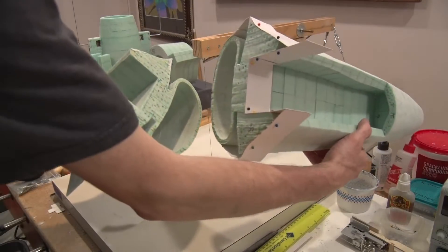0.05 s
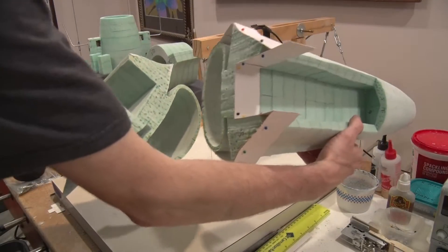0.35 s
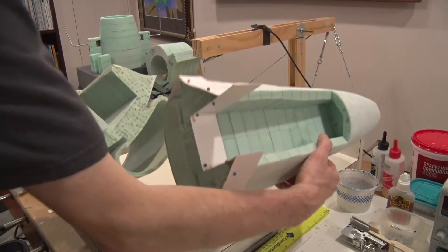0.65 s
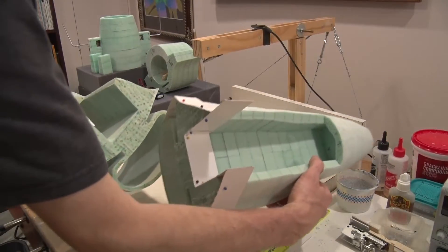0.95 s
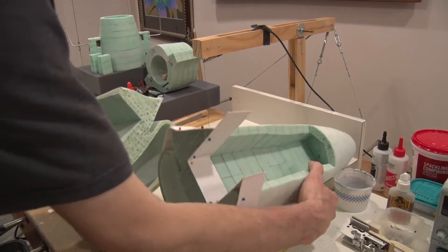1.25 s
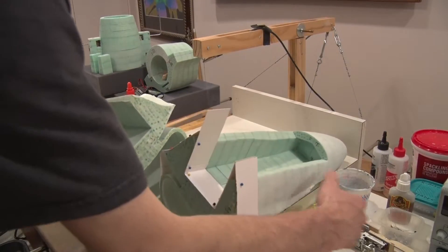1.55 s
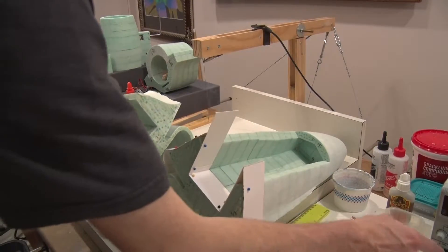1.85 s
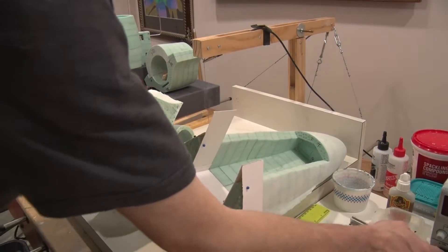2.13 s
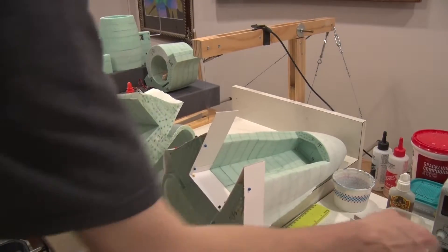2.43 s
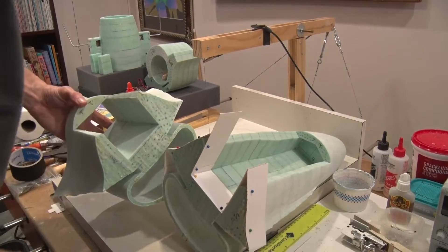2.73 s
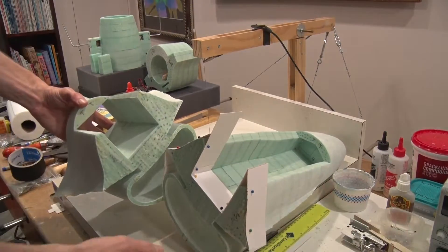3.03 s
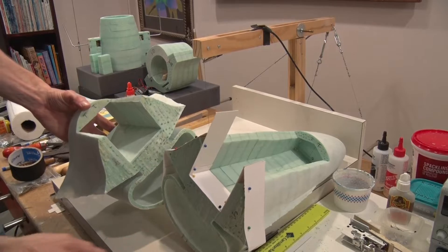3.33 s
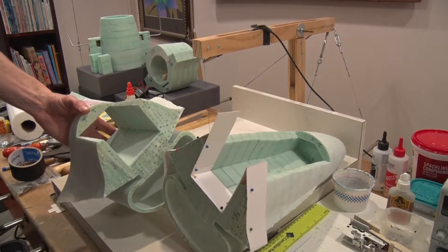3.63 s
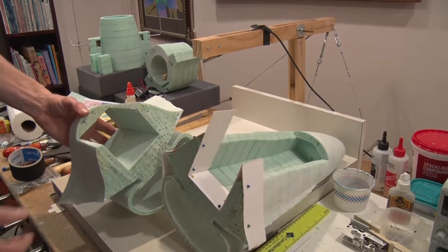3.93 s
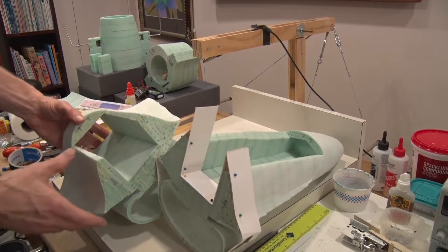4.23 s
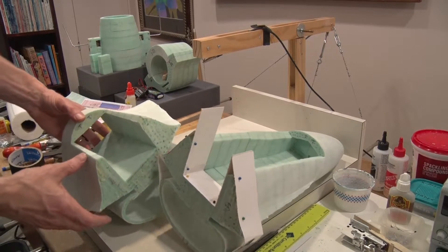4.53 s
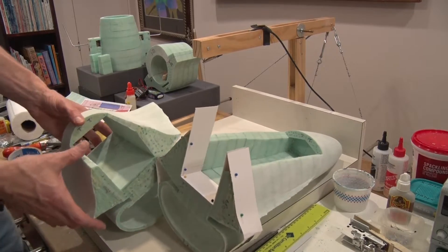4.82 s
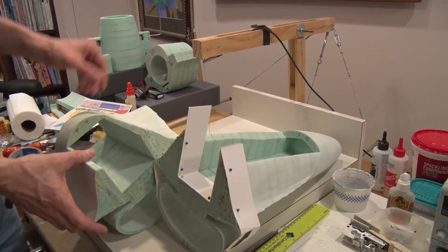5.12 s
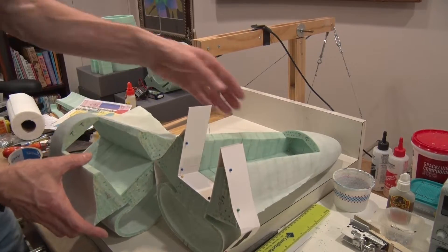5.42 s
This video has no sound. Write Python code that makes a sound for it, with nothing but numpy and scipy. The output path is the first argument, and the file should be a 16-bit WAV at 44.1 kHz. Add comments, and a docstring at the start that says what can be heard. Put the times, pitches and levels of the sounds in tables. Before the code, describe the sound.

Close by in a small, quiet workshop, light foam pieces are handled on a bench. Dull, hollow bumps come first, followed by a dry scrape and a clicking knock as one piece is set down. A hard object clacks once. Short squeaks follow, then foam rubs on foam, catching and snapping free before the rubbing fades. Faint sleeve rustle runs underneath.

```python
"""Foam pieces on a workbench

A hollow foam shell bumps, rocks, scrapes and lands, ringing with the bench; something hard clacks down.
A second foam piece is gripped, dragged over and pressed against the first. The foam catches and slips,
so it squeaks, hisses and snaps free. A shirt rustles close by in the small, quiet workshop."""
import sys
import numpy as np
from scipy import signal
from scipy.fft import rfft, irfft, next_fast_len
from scipy.io import wavfile

SR = 44100
rng = np.random.default_rng(int(sys.argv[2]) if len(sys.argv) > 2 else 0)


def wav_record(signal):
    """Record a signal, one row per channel, as 16-bit PCM in the file named by sys.argv[1]."""
    frames = np.transpose(np.atleast_2d(signal))
    bounded = np.clip(frames, -1, 1)
    # unit amplitude maps onto the largest positive 16-bit level
    quanta = np.round(bounded * 32767).astype(np.int16)
    wavfile.write(sys.argv[1], SR, quanta)


N = 245637
T = np.arange(N) / SR
BLOW_T = T[:SR // 2]  # half a second for one blow to die away

# The steady air of the room. Each row: pitch in Hz, level in dB.
AIR_COLOUR = [(20, -19.5), (58, 7), (99, -7.5), (185, -1), (427, -25), (714, -8), (1020, -7.5),
              (2110, -11.5), (2610, -22.5), (3620, -15), (6210, -26.5), (14000, -37), (16000, -71.5)]
# The sleeve rustles as the arm moves. Each row: time in seconds, level in dB.
SLEEVE_LEVELS = [(0, -50), (.87, -50), (1.9, -49.5), (2.45, -49), (2.98, -58), (3.5, -63.5), (4.03, -60.5),
                 (4.4, -53.5), (5.2, -69), (5.57, -62.5)]
# The dragged piece shudders on the bench. Each row: time in seconds, level in dB.
DRAG_LEVELS = [(4.1, -91), (4.19, -71), (4.24, -58), (4.33, -53), (4.42, -53), (4.5, -66), (4.56, -72),
               (4.8, -64), (4.95, -100)]
# How dull or bright each sound is. Each row: pitch in Hz, level in dB.
SLEEVE_COLOUR = [(65, -36.5), (110, -44), (140, -4.5), (198, -6.5), (297, -0.5), (327, -2.5), (485, -1.5),
                 (594, 1), (770, -6), (873, -12), (1100, -30.5), (1430, -31.5), (2420, -63.5)]
ECHO_COLOUR = [(100, 22), (700, 2.5), (3000, 0.5), (6000, -2.5), (10000, -5), (16000, -14.5)]
SIDE_ECHO_COLOUR = [(130, -49.5), (250, -58), (500, -24), (1000, -13), (4000, -11), (12000, -13)]
HISS_COLOUR = [(900, -18.5), (1800, -2.5), (2600, 1.5), (4300, 4), (7500, -4), (10500, -11.5),
               (15500, -21.5)]
BODY_COLOUR = [(580, -11), (700, 3), (870, -4), (1020, -3), (1350, -3.5), (1700, -5.5), (2200, -6),
               (3200, -18)]
DRAG_COLOUR = [(30, -2.5), (60, -2.5), (130, 5.5), (240, 0), (450, -5.5), (800, -20)]
SCRAPE_COLOUR = [(150, -27), (230, -9.5), (400, -16.5), (612, -11.5), (709, -5), (1100, -13), (1700, -10.5),
                 (4600, -16), (8580, -28), (16000, -44.5)]
# How long the room echoes. Each row: pitch in Hz, seconds to fade by 60 dB.
ECHO_FADES = [(200, 0.25), (2000, 0.45), (6000, 0.4), (14000, 0.36)]
# A hand or a flat face slides over foam.
# Each row: start in seconds, length in seconds, hiss in dB, hollow body in dB.
SLIDES = [(-.03, 0.11, -52, -53), (1.379, 0.099, -49.5, -46.5), (1.423, 0.18, -40, -37.5),
          (1.633, 0.14, -43, -44), (1.884, 0.081, -55.5, -50), (2.086, 0.094, -55, -56),
          (3.751, 0.96, -58.5, -53), (4.264, 0.41, -44, -43.5), (4.488, 0.047, -34, -45),
          (4.745, 0.19, -47.5, -43.5), (4.976, 0.21, -43, -48.5), (5.187, 0.16, -53.5, -54.5),
          (5.348, 0.28, -50.5, -51.5)]
# A foam edge scrapes.
# Each row: start in seconds, length in seconds, level in dB, brightness in dB per octave.
SCRAPES = [(0.138, 0.0061, -50, 6.5), (0.412, 0.041, -55.5, 2), (0.677, 0.03, -56.5, 3.5),
           (0.772, 0.058, -48, -0.5), (1.286, 0.11, -50.5, 3), (1.43, 0.013, -37.5, -2.5),
           (1.448, 0.039, -42, 9.5), (1.575, 0.032, -39, 2.5), (2.049, 0.028, -49.5, -1),
           (4.175, 0.04, -40, 1.5), (4.313, 0.045, -39.5, 8), (4.369, 0.03, -41, 1),
           (4.407, 0.012, -37.5, 3.5), (4.572, 0.019, -37.5, 3), (4.694, 0.013, -42.5, 5.5),
           (4.738, 0.0046, -31, -0.5), (4.826, 0.014, -39, -0.5), (4.995, 0.051, -46.5, 3),
           (5.054, 0.028, -43, 0.5), (5.501, 0.077, -52, 15)]
# Foam or a fingertip sticks and slips.
# Each row: start in seconds, length in seconds, first and last pitch in Hz, level in dB.
JUDDERS = [(1.427, 0.09, 1130, 1070, -40), (1.459, 0.031, 369, 650, -38.5), (1.484, 0.07, 1028, 1150, -40),
           (4.173, 0.0265, 308, 186, -46), (4.976, 0.043, 243, 117, -49)]
# The gripped piece squeaks.
# Each row: start in seconds, length in seconds, level in dB, extra level of its tone in dB.
SQUEAKS = [(2.797, 0.0086, -47.5, 7), (3.025, 0.0097, -53.5, 7), (3.193, 0.047, -43, 8.5),
           (3.248, 0.062, -43.5, 8), (3.413, 0.027, -53, -9.5), (3.524, 0.0055, -48.5, 0.5),
           (3.565, 0.01, -50, -2), (3.636, 0.016, -43, 4), (3.674, 0.0066, -44, -8),
           (3.995, 0.011, -55, 14)]
# Where the rubbed foam wall rings. Each row: pitch in Hz, width in Hz, level in dB.
WALL_TONES = [(555, 22, 10), (1130, 64, 4.5), (1404, 120, -1), (2060, 150, -5), (2660, 115, -13),
              (3110, 180, -7), (3650, 60, -0.5), (4130, 68, -4), (4600, 150, -8), (5240, 190, -12),
              (5800, 180, -10)]
# The ringing of the hard thing, the hand-held shell, and the shell resting on the bench.
# Each row: pitch in Hz, level in dB, seconds to fade by 60 dB.
HARD_TONES = [(371, -9, 0.14), (577, -5.5, 0.5), (1238, 0, 0.11), (2290, -10.5, 0.22), (2600, -8.5, .1),
              (3282, 10.5, 0.03), (5000, 3, 0.1), (7220, 6, 0.021), (13900, 10, 0.0038)]
SHELL_TONES = [(150, -6, 0.46), (197, -15, 0.22), (226.7, -5.5, 0.28), (287, -15.5, 0.73), (326, -8.5, .15),
               (372, -3.5, 0.41), (465.2, 3, 0.43), (503, -10.5, 0.17), (616, -32, 0.14), (670, 1, 0.084),
               (800, -17, 0.12)]
LANDING_TONES = [(221, -5, 0.2), (312, -8.5, 0.15), (367, 5, 0.13), (518, 6, 0.34), (696, 4, 0.23),
                 (757, -17, 0.15), (864, -2.5, 0.11), (970, -1, 0.18), (1035, -0.5, .16), (1180, 0.5, 0.12),
                 (1220, -8, 0.1)]
# Sharp foam clicks: the shell striking the bench, and edges snapping free. Each row: start in seconds,
# level in dB, low and high cutoff in Hz, ringing pitch in Hz, ringing level in dB.
FOAM_CLICKS = [(0.2893, -23, 1200, 4350, 2000, 3), (0.5287, -24, 1200, 4400, 1310, 4),
               (0.6992, -46, 700, 2200, 1110, 0), (0.928, -39.5, 2000, 4200, 4300, 3),
               (1.2151, -28.5, 1200, 7500, 4700, 3.5), (1.4519, -6, 323, 4100, 770, -3),
               (1.565, -22.5, 2500, 7200, 4500, 2), (1.617, -6, 300, 5500, 980, -3),
               (1.6193, -5.5, 892, 10700, 3840, -41.5), (1.658, -16, 700, 3430, 1170, -3),
               (2.1962, -37, 3970, 13900, 7950, -4.5), (2.242, -32, 900, 3500, 2600, 1),
               (2.96, -30.5, 4000, 4800, 5870, -6), (3.845, -29, 890, 5660, 4270, -36),
               (3.967, -20.5, 870, 5700, 3650, -13), (4.5111, -7.5, 2030, 7000, 3710, 0.5),
               (4.5125, -11, 3000, 5970, 4770, 21), (4.7464, -0.5, 9000, 9700, 5000, -6.5),
               (4.7478, -5, 1220, 4600, 2150, -8), (4.7495, -9, 700, 4030, 970, -6),
               (5.041, -23.5, 910, 1620, 1240, 3), (5.4056, -32, 1500, 8100, 3350, 1)]
# The shell bumps the bench. Each row: start in seconds, level in dB, treble cutoff in Hz.
KNOCKS = [(0.2895, -5, 780), (0.5275, -7, 725), (0.551, -12.5, 637), (0.6984, -8, 563), (0.832, -12, 400),
          (0.9272, -11, 382), (0.97, -16, 260), (1.097, -16.5, 320), (1.222, -18.5, 238), (1.258, -18, 400),
          (1.295, -24.5, 1400), (1.617, -19, 2530), (1.657, -13.5, 1520)]


def amp(db):
    """Turn decibels into a gain."""
    return 10 ** (np.asarray(db) / 20)


def unit(x):
    """Give a blow the energy of 10 ms at a tenth of full scale."""
    return x * np.sqrt(SR / 10 ** 4 / np.sum(x ** 2))


def steady(x):
    """Give a lasting sound an average strength of 1."""
    return x / np.std(x)


def along(points, hz):
    """Read between a table's rows at the given pitches."""
    pitches, values = np.transpose(points)
    return np.interp(np.log(hz + 1), np.log(pitches), values)


def colour(x, points, tilt_db=0):
    """Shape bass and treble by a table, tilted per octave and falling steeply past its ends."""
    size = next_fast_len(len(x) + 2048)
    hz = np.fft.rfftfreq(size, 1 / SR) + 1
    ends = np.minimum(hz / points[0][0], 1) ** 2 * np.minimum(points[-1][0] / hz, 1) ** 3
    gain = amp(along(points, hz) + tilt_db * np.log2(hz))
    return irfft(rfft(x, size) * ends * gain, size)[:len(x)]


def keep_band(x, hz, kind, order=2):
    """Keep the "low" or the "high" side of a cutoff."""
    sections = signal.butter(order, min(hz, .45 * SR), kind, fs=SR, output="sos")
    return signal.sosfilt(sections, x + 1e-18)


def resonate(x, hz, width):
    """Let a sound ring around one pitch."""
    return signal.lfilter(*signal.iirpeak(hz, hz / width, fs=SR), x + 1e-18)


def ring(tones, detune_share=0.0046, uneven_db=1.0):
    """Fading tones; each blow lands elsewhere and shares its energy out differently."""
    chance = rng.standard_normal((len(tones), 3)) * [1, detune_share, uneven_db]
    out = np.zeros(len(BLOW_T))
    for (hz, db, fade_s), (sign, detune, share_db) in zip(tones, chance):
        fade = amp(db + share_db - 60 * BLOW_T / fade_s)
        out += np.sign(sign) * fade * np.sin(2 * np.pi * hz * (1 + detune) * BLOW_T)
    return unit(out)


def add(track, start, x):
    """Mix x into the track at a start time in seconds."""
    i = max(int(start * SR), 0)
    track[i:i + len(x)] += x[:N - i]


def curve(rows):
    """Join rows of seconds and dB into a changing gain."""
    return amp(np.interp(T, *np.transpose(rows)))


def wander(rate):
    """Drift to a new random value `rate` times a second."""
    return np.interp(T * rate, np.arange(N), rng.standard_normal(N))


def stroke(start, length, rise_s, fall_s):
    """The pressure of one movement rises, holds and falls."""
    return np.clip((T - start) / rise_s, 0, 1) * np.exp(-np.maximum(T - start - length, 0) / fall_s)


def friction(per_second, spread_db, uneven_db):
    """A surface catches and slips: tiny clicks of unequal size, in uneven spurts."""
    slips = (rng.random(N) < per_second / SR) * rng.standard_normal(N)
    size_db = spread_db * np.minimum(rng.exponential(size=N), 4)
    return steady(slips * amp(size_db + uneven_db * wander(70)))


def background(air_db=-63):
    """A sleeve rustles softly over the steady air of the room."""
    sleeve = steady(colour(friction(6000, 0.47, 0.4), SLEEVE_COLOUR)) * curve(SLEEVE_LEVELS)
    return sleeve + amp(air_db) * steady(colour(rng.standard_normal(N), AIR_COLOUR))


def workshop_echo(x, early_db=-5, late_db=-6.0, early_s=0.005, build_s=0.0037):
    """Sound bounces quickly off bench and clutter, then lingers briefly in the room."""
    hz, seconds, bands = signal.stft(rng.standard_normal(len(BLOW_T)), SR)
    fade = amp(-60 * seconds / along(ECHO_FADES, hz)[:, None])
    late = signal.istft(bands * fade, SR)[1][:len(BLOW_T)]
    early = rng.standard_normal(len(BLOW_T)) * np.exp(-BLOW_T / early_s)
    arrive = np.minimum(BLOW_T / build_s, 1) ** 2
    echo = sum(amp(db) * part * arrive / np.linalg.norm(part * arrive)
               for part, db in ((early, early_db), (late, late_db)))
    return signal.fftconvolve(x, colour(echo, ECHO_COLOUR))[:N]


def side_echo(x, fade_s=0.013):
    """Sideways echoes reach left and right unequally, which widens the treble."""
    scatter = rng.standard_normal(len(BLOW_T)) * np.exp(-BLOW_T / fade_s)
    return colour(signal.fftconvolve(x, scatter / np.linalg.norm(scatter))[:N], SIDE_ECHO_COLOUR)


def foam_wall(x, ring_db=-5, ring_s=0.00092):
    """The stiff, light wall colours any rubbing with many short tones that shift as the touch moves."""
    responses = rng.standard_normal((2, len(BLOW_T))) * np.exp(-BLOW_T / ring_s)
    here, there = (steady(signal.fftconvolve(x, response)[:N]) for response in responses)
    place = np.pi * wander(5)
    return x + amp(ring_db) * (np.cos(place) * here + np.sin(place) * there)


def sliding(arm_hiss_db=-62, arm_body_db=-50, sag_db_per_s=2):
    """Gains for hiss and hollow body: a light rub that follows the arm, plus strokes that ease off."""
    arm = (curve(SLEEVE_LEVELS) / curve(SLEEVE_LEVELS).max()) ** 2.2
    hiss_power, body_power = (amp(arm_hiss_db) * arm) ** 2, (amp(arm_body_db) * arm) ** 2
    for start, length, hiss_db, body_db in SLIDES:
        sag = amp(-sag_db_per_s * np.clip(T - start, 0, length))
        press = stroke(start, length, rise_s=0.032, fall_s=0.05) * sag
        hiss_power += (amp(hiss_db) * press) ** 2
        body_power += (amp(body_db) * press) ** 2
    return np.sqrt(hiss_power), np.sqrt(body_power)


def rubbing(hiss_db=-4, body_db=-2, catch_db=-13):
    """Skin and foam slide on foam: a crackling hiss, a hollow body and a low shudder."""
    hiss_gain, body_gain = sliding()
    hiss = steady(colour(foam_wall(friction(20000, 1.6, 1.2)), HISS_COLOUR))
    # now and then one foam cell catches harder than the rest
    hiss += amp(catch_db) * steady(colour(friction(110, 1.5, 1), HISS_COLOUR))
    body = steady(colour(foam_wall(friction(8000, 1.6, 1.2)), BODY_COLOUR))
    drag = steady(colour(friction(990, 0.69, 0.91), DRAG_COLOUR)) * curve(DRAG_LEVELS)
    return amp(hiss_db) * hiss * hiss_gain + amp(body_db) * body * body_gain + drag


def scrapes(uneven_db=1.5):
    """A foam edge scrapes in short, dry bursts under an unsteady hand."""
    slips = foam_wall(friction(5000, 1.5, 2.2)) * amp(uneven_db * wander(110))
    out = np.zeros(N)
    for start, length, db, tilt_db in SCRAPES:
        press = stroke(start, length, rise_s=0.0052, fall_s=0.013)
        out += amp(db) * press * steady(colour(slips, SCRAPE_COLOUR, tilt_db))
    return out


def judders(rough_db=5.0, waver_share=0.022, overtone_db=-13):
    """Foam or a fingertip sticks and slips: a short, rough tone that follows the sliding speed."""
    out = np.zeros(N)
    waver = 1 + waver_share * wander(150)
    rough = amp(rough_db * wander(200))
    for start, length, first_hz, last_hz, db in JUDDERS:
        now = (T >= start) & (T < start + length)
        progress = (T[now] - start) / length
        hz = (first_hz + (last_hz - first_hz) * progress) * waver[now]
        phase = 2 * np.pi * np.cumsum(hz) / SR
        tone = np.sin(phase) + amp(overtone_db) * np.sin(2 * phase)
        out[now] += amp(db) * rough[now] * np.sin(np.pi * progress) * tone
    return out


def squeaks(sing_hz=711.5, lag_s=0.0078, rise_s=0.008, fall_s=0.019, sag_db_per_s=130,
            firm_hz=14000, firm_db=-43):
    """A firm grip rubs the foam wall; a moment later the wall sings a wavering, fading tone."""
    phase = 2 * np.pi * sing_hz * T + .5 * wander(75)
    sing = np.sqrt(2) * np.sin(phase) * amp(1.2 * wander(220))
    slips = friction(12000, 1., 1.3) * amp(5 * np.sin(phase))  # the skin slips once a cycle
    wall = steady(sum(amp(db) * resonate(slips, hz, width) for hz, width, db in WALL_TONES))
    rasp = amp(-4) * steady(colour(slips, SCRAPE_COLOUR, tilt_db=2.7)) + amp(-5) * wall
    out = np.zeros(N)
    for start, length, db, tone_db in SQUEAKS:
        sag_db = sag_db_per_s * np.clip(T - start - rise_s, 0, length)
        sing_gain = stroke(start + lag_s, length - lag_s, rise_s, fall_s) * amp(tone_db - sag_db)
        # a lighter grip sounds duller: the cutoff drops an octave every 9 dB
        rub = keep_band(rasp, firm_hz * 2 ** ((db - firm_db) / 9), "low", order=1)
        out += amp(db) * (stroke(start, length, rise_s, fall_s) * rub + sing_gain * sing)
    return out


def contact(low_hz, high_hz, chatter_ms, ring_hz, ring_db, crack_db=-11):
    """A ringing crack: one sound with chatter for the listener, a smoother one for the walls."""
    crack = unit(1. * (BLOW_T == 0))
    chatter = unit(rng.uniform(-1, 1, len(BLOW_T)) * np.exp(-BLOW_T * 1000 / chatter_ms))
    sounds = []
    for force in (chatter - amp(crack_db) * crack, crack):
        # little of the bass gets into the air
        blow = keep_band(force, low_hz, "high", order=1)
        blow = keep_band(blow, 410, "high")
        blow = keep_band(blow, high_hz, "low", order=3)
        ringing = unit(resonate(blow, ring_hz, width=ring_hz / 9))
        sounds.append(unit(unit(blow) + amp(ring_db) * ringing))
    return sounds


def clack(start=2.446, first_db=-5, second_db=-7, ring_db=-7.5, room_db=-2.0):
    """One end of the hard thing hits the bench, then the other, and it rings briefly."""
    out, to_room = np.zeros(N), np.zeros(N)
    first, spread = contact(low_hz=1087, high_hz=6800, chatter_ms=1.8, ring_hz=7740, ring_db=-11.0)
    second, _ = contact(low_hz=700, high_hz=5500, chatter_ms=14, ring_hz=4800, ring_db=-3.0)
    ringing = amp(ring_db) * ring(HARD_TONES)
    add(out, start, amp(first_db) * first + ringing)
    add(out, start + 0.0026, amp(second_db) * second)
    add(to_room, start + 0.0016, amp(room_db) * (spread + ringing))
    return out, to_room


def foam_clicks(chatter_ms=2.4, room_db=-2):
    """Foam clicks sharply as the shell strikes the bench or an edge snaps free."""
    out, to_room = np.zeros(N), np.zeros(N)
    for start, db, low_hz, high_hz, ring_hz, ring_db in FOAM_CLICKS:
        direct, spread = contact(low_hz, high_hz, chatter_ms, ring_hz, ring_db)
        add(out, start, amp(db) * direct)
        add(to_room, start + 0.002, amp(db + room_db) * spread)
    return out, to_room


def landing(start=1.617, ring_db=-1.5, hollow_db=-5.0, hollow_hz=152, swell_s=.06, fade_s=.125):
    """The shell lands and rings with the bench; the air inside it swells and dies away."""
    out = np.zeros(N)
    swell = (1 - np.exp(-BLOW_T / swell_s)) ** 3
    hollow = np.sin(2 * np.pi * hollow_hz * BLOW_T) * swell * amp(-60 * BLOW_T / fade_s)
    ringing = keep_band(ring(LANDING_TONES), 80, "high")
    add(out, start, amp(ring_db) * ringing + amp(hollow_db) * unit(hollow))
    return out


def knocks(thud_db=-4.0, thud_hz=350, thud_s=0.0025, rebound_db=-6, rebound_s=0.012,
           rattle_db=-4, rattle_s=0.28, shell_db=-1):
    """Each bump thuds, bounces once, rings the shell and shakes loose things on the bench."""
    out = np.zeros(N)
    push = np.sin(2 * np.pi * thud_hz * BLOW_T) * np.exp(-BLOW_T / thud_s)
    for start, db, bright_hz in KNOCKS:
        thud = unit(keep_band(push, bright_hz, "low", order=1))
        rattle = rng.standard_normal(len(BLOW_T)) * amp(-60 * BLOW_T / rattle_s)
        rattle = keep_band(rattle, 160, "high", order=4)
        rattle = unit(keep_band(rattle, bright_hz, "low", order=3))
        # the shifting grip changes the shell's tones at every bump
        shell = ring(SHELL_TONES, detune_share=.018, uneven_db=2.2)
        shell = keep_band(shell, bright_hz, "low", order=1)
        add(out, start, amp(db) * (amp(thud_db) * thud + amp(rattle_db) * rattle + amp(shell_db) * shell))
        add(out, start + rebound_s * rng.uniform(.7, 1.3), amp(db + thud_db + rebound_db) * thud)
    return keep_band(out, 111, "high", order=6)  # so light a shell gives off no deep bass


def scene(slide_db=-3.0, squeak_db=-3.5, balance_db=-0.98, clack_pan_db=-3.0):
    """Mix it all with the room's echo, near the middle, with the clack a little further right."""
    clicks, clicks_to_room = foam_clicks()
    hit, hit_to_room = clack()
    bumps = knocks() + landing()
    slides = amp(slide_db) * (scrapes() + rubbing() + judders())
    grip = amp(squeak_db) * squeaks()
    to_room = clicks_to_room + hit_to_room + amp(-16) * bumps
    to_room += amp(-4) * (keep_band(slides, 480, "high") + grip)
    middle = clicks + bumps + slides + grip + workshop_echo(to_room) + background()
    left_right = np.array([[1], [-1]])
    stereo = middle * amp(left_right * balance_db / 2) + hit * amp(left_right * clack_pan_db / 2)
    return stereo + left_right * side_echo(middle + hit)


def record(dry):
    """Cut off the very highest treble, above 15900 Hz."""
    return signal.sosfilt(signal.ellip(10, .2, 70, 15900, fs=SR, output="sos"), dry)


dry = scene()
out = record(dry)
wav_record(out)
```